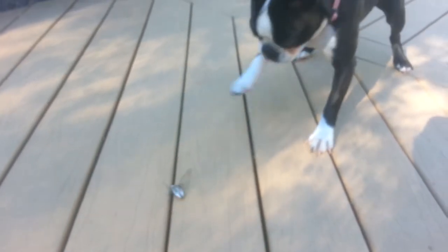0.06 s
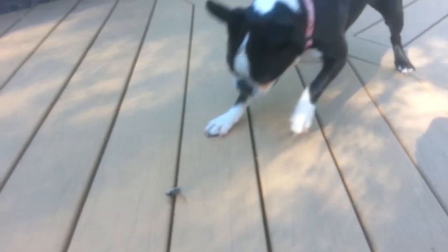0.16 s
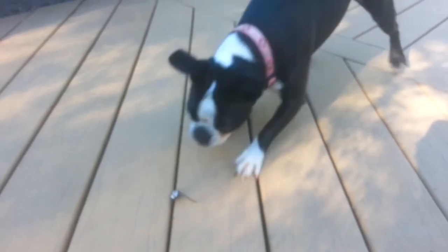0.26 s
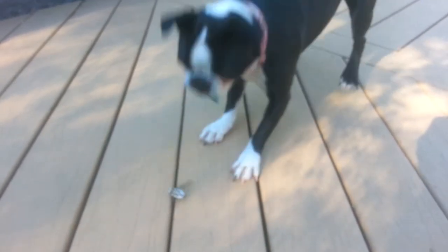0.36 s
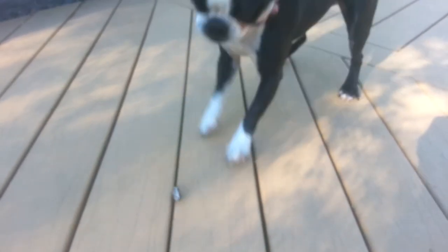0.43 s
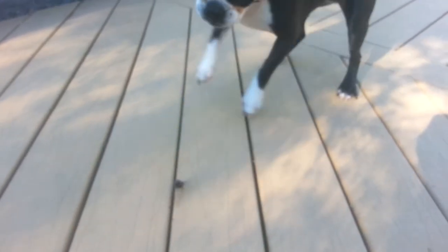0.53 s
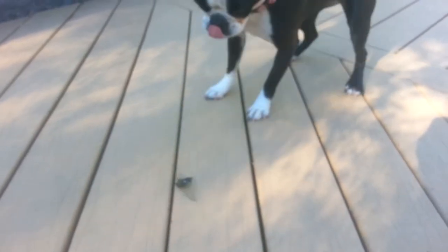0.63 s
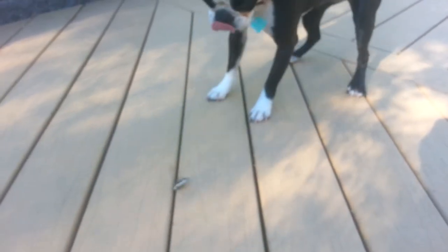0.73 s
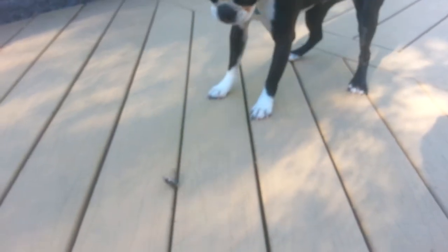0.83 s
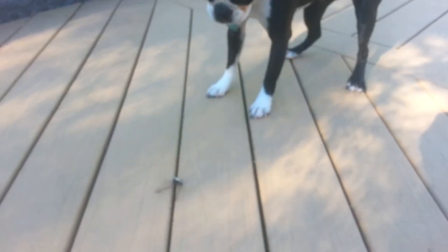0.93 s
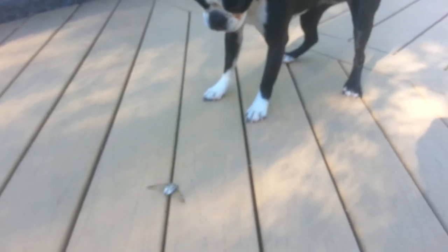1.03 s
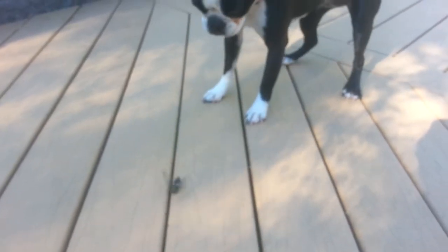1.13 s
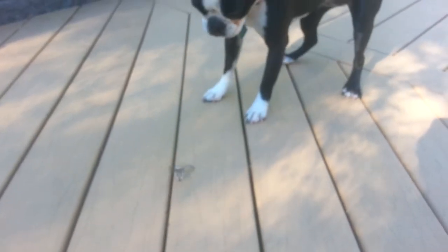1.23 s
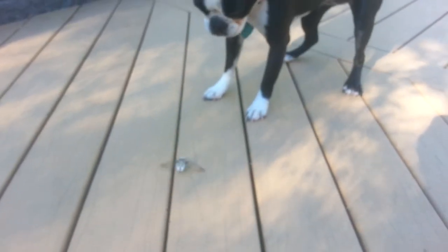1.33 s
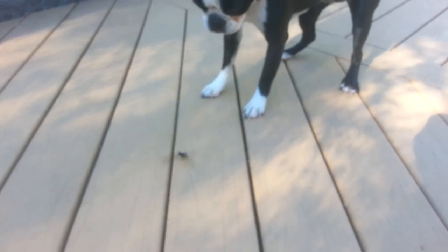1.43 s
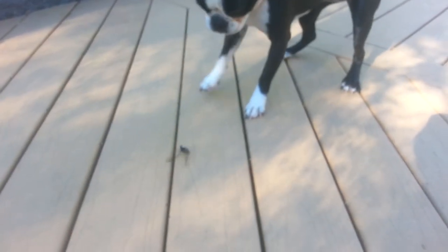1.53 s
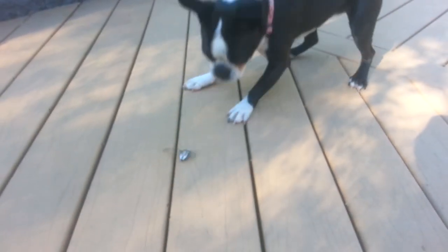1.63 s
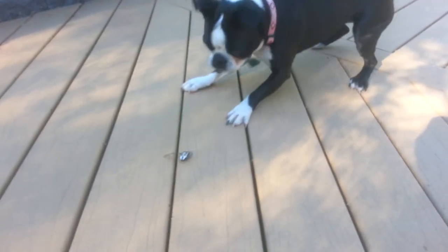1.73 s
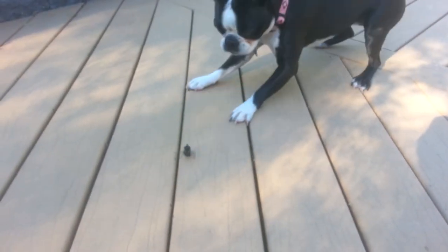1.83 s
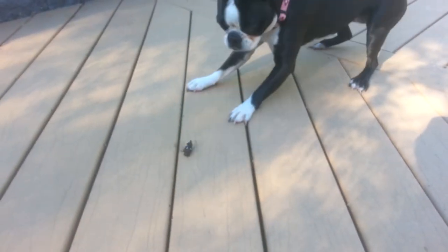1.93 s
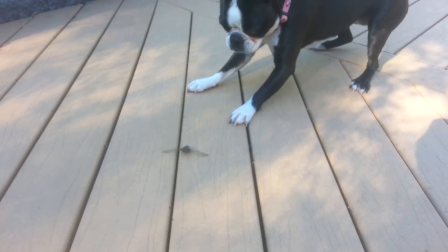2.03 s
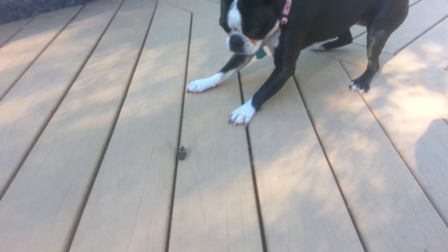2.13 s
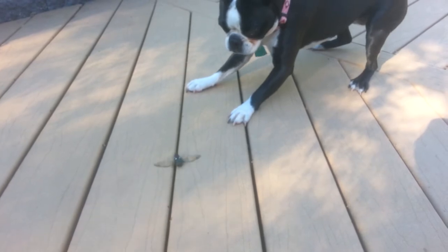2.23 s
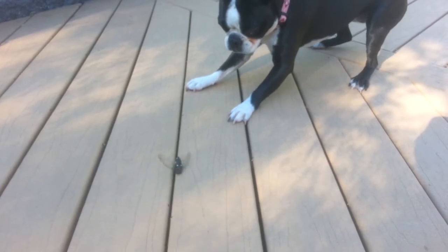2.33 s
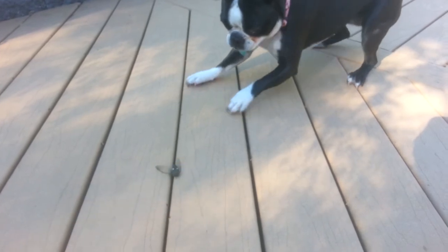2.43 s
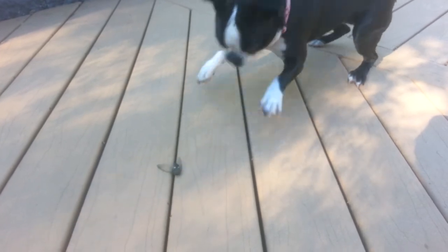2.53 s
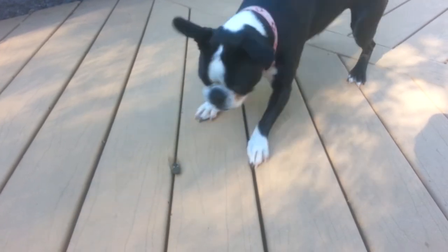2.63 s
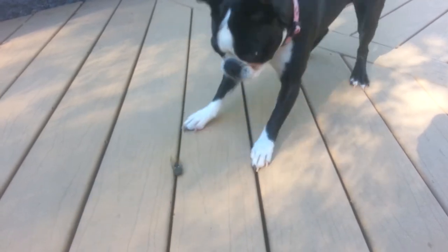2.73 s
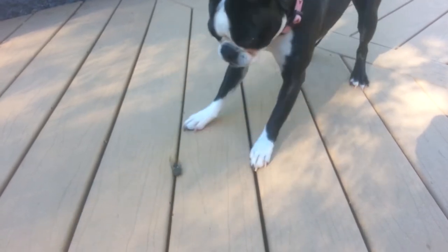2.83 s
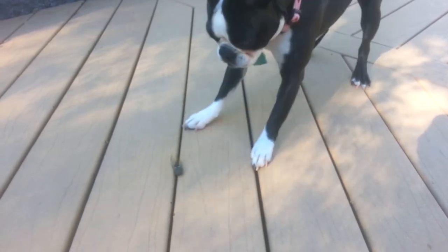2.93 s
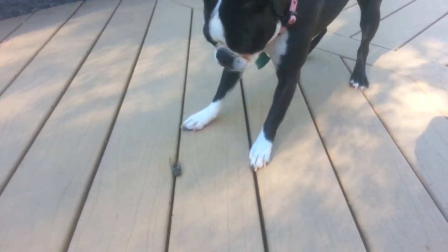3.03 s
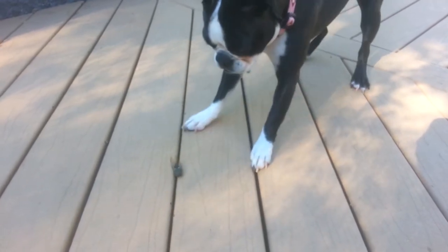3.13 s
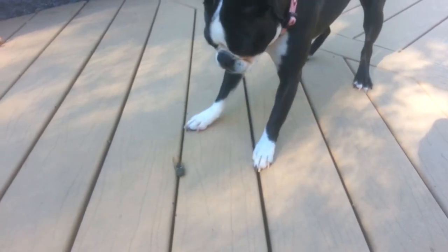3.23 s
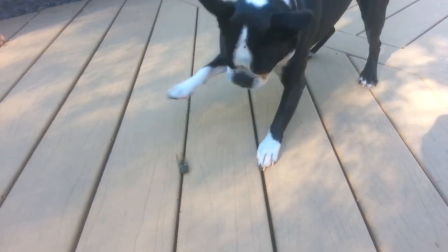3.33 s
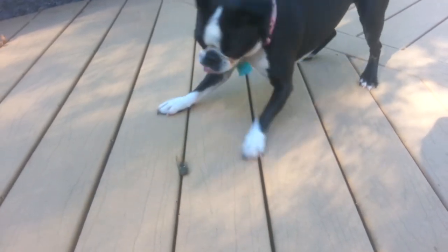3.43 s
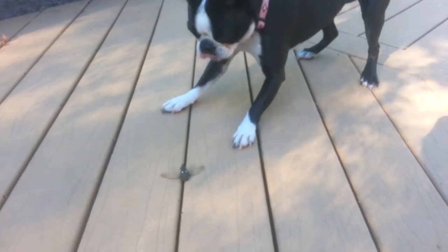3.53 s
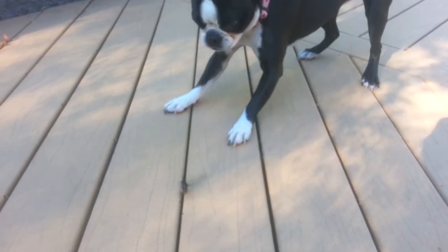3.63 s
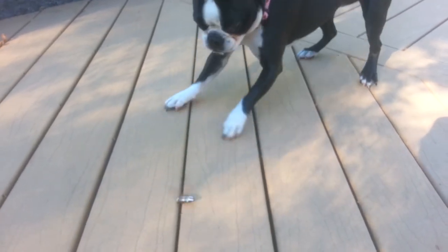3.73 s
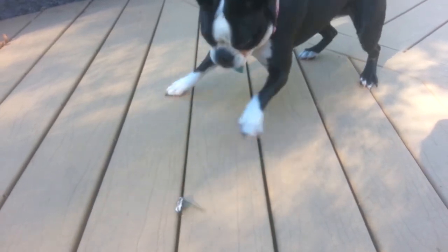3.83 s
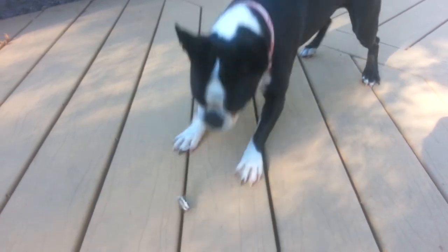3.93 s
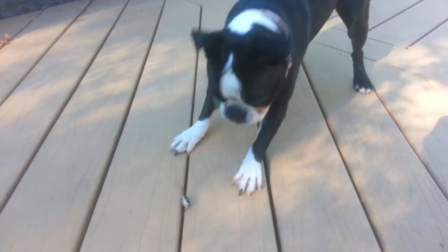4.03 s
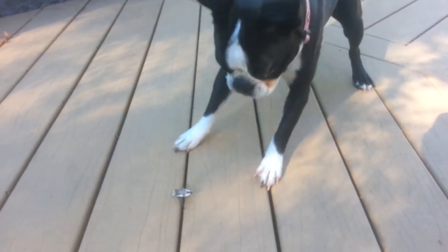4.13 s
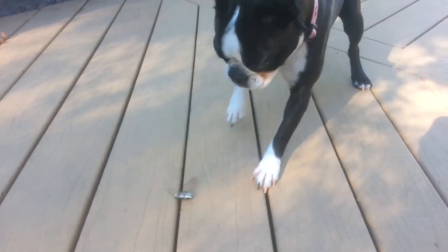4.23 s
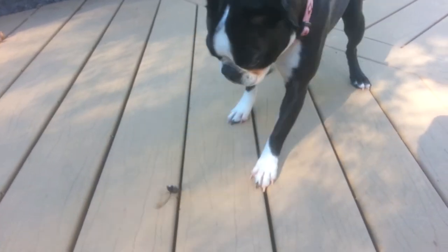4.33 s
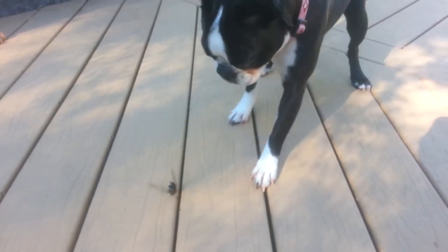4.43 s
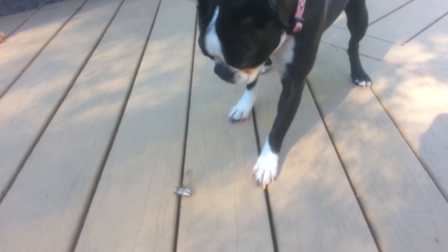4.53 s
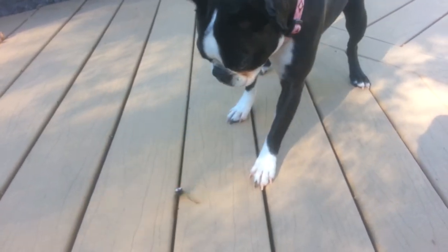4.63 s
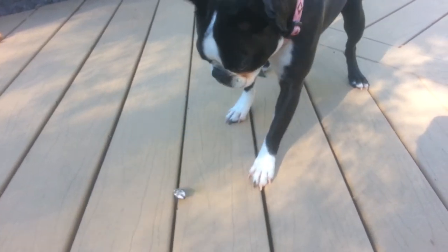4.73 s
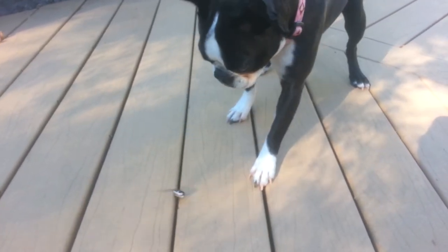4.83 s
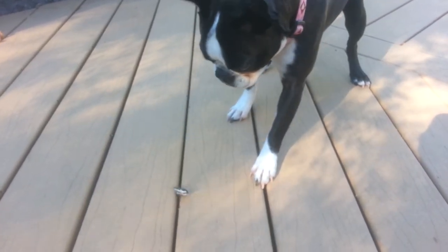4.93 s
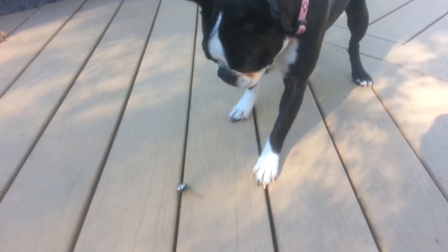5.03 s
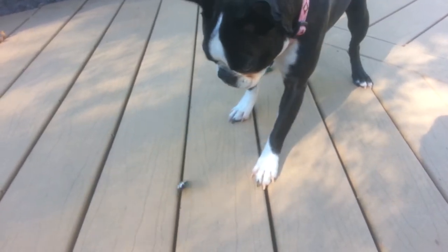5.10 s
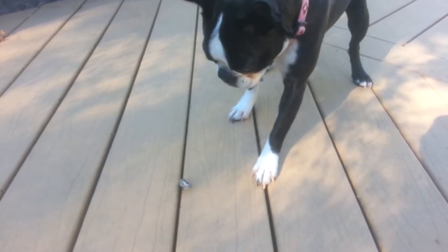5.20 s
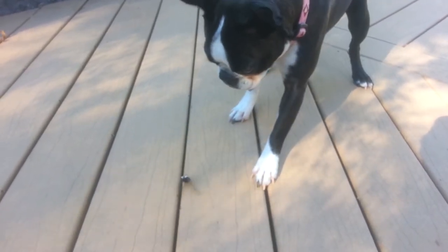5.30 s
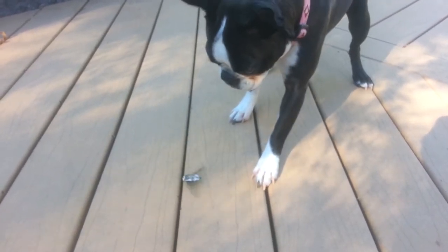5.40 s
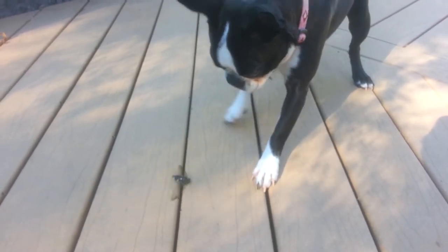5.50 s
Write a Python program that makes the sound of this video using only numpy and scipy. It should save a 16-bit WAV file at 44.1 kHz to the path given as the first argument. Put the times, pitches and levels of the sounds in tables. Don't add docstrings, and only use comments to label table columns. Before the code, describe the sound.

On a garden deck a dog paws at a cicada, heard close in stereo. Claws tick, scrape and thump on boards, thin tags clink, and wings slap dryly. After a quieter second with a soft snuffle, more scuffles come in bursts. The hardest thump, at four seconds, sets off nine fast hollow pops from the insect, then a louder sniff and a few last slaps over faint far cicadas.

```python
import sys
import numpy as np
from scipy import signal
from scipy.fft import rfft, irfft
from scipy.io import wavfile
from scipy.ndimage import uniform_filter1d, minimum_filter1d

SR = 44100
rng = np.random.default_rng(int(sys.argv[2]) if len(sys.argv) > 2 else 0)


def persist_wave(psi):
    counts = np.round(np.clip(psi, -1, 1) * 32767).astype(np.int16)
    wavfile.write(sys.argv[1], SR, np.atleast_2d(counts).T)


def level_to_linear(level):
    exponent = np.asarray(level, float) / 20
    return 10 ** exponent


N = 245195


def evened(x):
    return x / np.sqrt(np.mean(x ** 2) + 1e-20)


def read(points, hz):
    f, value = np.transpose(points)
    return np.interp(np.log(hz + 1), np.log(f + 1), value)


def band(x, low_hz, high_hz):
    return signal.sosfilt(signal.butter(2, [low_hz, min(high_hz, .45 * SR)], "band", fs=SR, output="sos"), x)


def resonate(x, hz, width_hz):
    r = np.exp(-np.pi * width_hz / SR)
    return 2 * signal.lfilter([1 - r], [1, -r * np.exp(2j * np.pi * hz / SR)], x).real


def add(mix, s, sound, pan_db=5.0, lag_ms=.07):
    for channel, start_s, db in zip(mix, (s + lag_ms / 1000, s), (pan_db / 2, -pan_db / 2)):
        part = channel[max(round(start_s * SR), 0):][:len(sound)]
        part += level_to_linear(db) * sound[:len(part)]


def crack(noise, low_hz, high_hz, fade_s):
    return evened(band(noise, low_hz, high_hz)) * np.exp(-np.arange(len(noise)) / SR / fade_s)


def pop(hz, sag_hz, width_s, phase):
    t = np.arange(300) / SR
    turns = hz * t - sag_hz * .0008 * np.exp(-t / .0007) + phase
    return 2 * (t / width_s) ** 1.79 * np.exp(-t / width_s) * np.cos(2 * np.pi * turns)


def tick_rows():
    # (time [s], 3.5 kHz body level [dB], dull crack [dB rel], bright crack [dB rel])
    claws = [(0.132, -29.5, 0, 6), (0.1386, -16.5, 3, -5), (0.1949, -20.5, -6, -13), (0.2817, -28, -4, -14),
             (0.327, -31, -8, -19), (0.4205, -24.5, -11, -29), (0.4348, -33, -8, -27),
             (0.5517, -35.5, -5.5, 4), (0.6157, -26, 0, -5), (0.7338, -52, 7, 18), (0.948, -48, 7, -17),
             (1.6291, -32, -1, -13), (1.6399, -25, -4.5, -9), (1.6594, -27, -8, -25), (1.73, -27, 5, -8),
             (2.615, -21, -5, -9), (2.622, -25, -1, -10), (2.7346, -26.5, -14, -20), (3.3508, -37, -1, -12),
             (3.392, -46, -33, 3), (3.426, -17.5, -3.5, -12), (3.897, -35, -5, -18),
             (3.9368, -45.5, -4.5, -6), (3.9612, -43.5, 9, -2), (3.978, -49, -21, 6),
             (3.9941, -17, -4, -14), (4.606, -54, 1, 3), (5.546, -47, 4, -20)]
    # (time [s], body level [dB], bright crack [dB rel], crack top over middle [dB])
    slaps = [(.0298, -37, 5, 1), (.081, -22, -7, -4), (.3966, -32, -8, -3), (.8475, -38, 9, 7),
             (.8914, -37, 6, 0.1), (.9184, -38.5, 5, 0.1), (1.1046, -41.5, 2.5, 1),
             (1.1943, -40.5, 2.5, -4), (1.3995, -32.5, 1.1, 5), (1.438, -31, -2, 5), (1.472, -42, -6, 7),
             (1.9315, -39.5, 2.5, 5), (2.102, -43, 2.5, 2), (2.142, -30.5, 0, 15), (2.1801, -37.5, 15.5, 8),
             (2.2127, -23.5, -1.5, 1.5), (2.2541, -31, 0.5, 5), (2.3156, -29, 8.5, -4),
             (2.8541, -40.5, -1, -6), (3.5567, -31.5, 8, -10.5), (3.5961, -27.5, 0.5, -14),
             (3.6354, -28.5, 3, -1), (3.7173, -42, 11, 3), (3.7403, -25, -5, -10), (4.4674, -48.5, 15.5, 7),
             (4.6301, -29, 5.5, 2), (4.797, -42, 12, 0.1), (5.0652, -35, 1, 27), (5.4519, -41, 4.5, 4),
             (5.5544, -29.5, -3.5, -6)]
    # (time [s], body level [dB])
    knocks = [
        (1.368, -48),
        (1.9734, -44),
        (2.5638, -42),
        (4.9, -43.5),
        (4.97, -42.5),
        (5.001, -50.5),
        (5.201, -41),
        (5.3258, -38.5),
        (5.382, -44),
        (5.399, -55),
    ]
    # (time [s], bright crack level [dB])
    snaps = [(0.6782, -32), (0.7218, -45), (0.742, -44), (0.7932, -38), (0.873, -45), (2.053, -47),
             (2.0727, -49), (4.9363, -44), (5.041, -42), (5.413, -40.5), (5.4388, -45)]
    snap_over_body_db, knock_bright_db, slap_dull_db = 6, -5, -9.5
    insect = list(slaps)
    insect += [(s, db, knock_bright_db, 0) for s, db in knocks]
    insect += [(s, db - snap_over_body_db, snap_over_body_db, 0) for s, db in snaps]
    rows = [(*row, 0, 5.5, .3) for row in claws]
    turns = 2 * rng.random((len(insect), 2)) - 1
    for (s, db, bright_db, top_db), (u, v) in zip(insect, turns):
        dull_db = max(bright_db, 0) + slap_dull_db
        pan_db, lag_ms = 6.5 + 5.5 * u, .34 + .03 * v
        rows.append((s, db, dull_db, bright_db, top_db, pan_db, lag_ms))
    return rows


def ticks():
    # (time [s], peak level [dB])
    flicks = [(0.276, -31.5), (0.518, -58), (0.54, -47), (0.576, -45), (0.758, -44.5), (0.8374, -64),
              (1.211, -47), (1.297, -50), (1.335, -47.5), (1.8265, -46.5), (3.6524, -38.5), (3.754, -37.5),
              (3.769, -42.5), (3.819, -45), (3.837, -36), (4.105, -48), (4.3114, -40), (4.3945, -36.5),
              (4.398, -45), (4.462, -41.5), (5.117, -51), (5.1532, -50), (5.307, -53.5), (5.3454, -51)]
    out = np.zeros((2, N))
    rows = tick_rows()
    chance, noise = rng.random((len(rows), 2)), rng.standard_normal((len(rows), 4, 1500))
    for (s, db, dull_db, bright_db, top_db, pan_db, lag_ms), (u, v), (a, b, c, d) in zip(rows, chance, noise):
        rough = np.clip((dull_db + 16.0) / 18, .35, .95)
        body = rough * crack(a, 2640, 6160, 0.0024)
        body[:300] += (1 - rough) * 1.25 * pop(3200 + 400 * u, 500, .00045, v)
        dull = level_to_linear(dull_db - 4.5) * crack(b, 960, 2280, 0.0017)
        middle = level_to_linear(-top_db / 2) * crack(c, 5500, 10500, .0007)
        top = level_to_linear(top_db / 2) * crack(c[::-1], 10500, 15000, .0007)
        hiss = 0.27 * crack(d, 5000, 20000, 0.0031)
        bright = level_to_linear(bright_db - 1.0) * (middle + top + hiss)
        add(out, s - .0008, level_to_linear(db + 5.0) * body, pan_db, abs(lag_ms))
        add(out, s - .0008, level_to_linear(db + 8.0) * dull, pan_db, lag_ms=0.15)
        add(out, s - .0004, level_to_linear(db + 10.0) * bright, 0.32 * pan_db, lag_ms=.05)
    for (s, db), noise in zip(flicks, rng.standard_normal((len(flicks), 400))):
        add(out, s, level_to_linear(db + 3.0) * crack(noise, 1800, 15400, 0.042), pan_db=3.5, lag_ms=0.14)
    return out


def skid_rows():
    # (start [s], fade [s], grit [dB], fizz [dB rel], claw pitch [Hz])
    slides = [(0.071, 0.071, -47.5, 13.5, 3540), (0.189, 0.041, -37.5, -28, 2550),
              (0.272, 0.076, -32.5, -10, 3960), (0.419, 0.052, -34.5, -63, 2580),
              (0.608, .11, -36, 1.5, 3700), (0.728, 0.078, -51.5, -8, 3730),
              (1.631, 0.053, -32.5, -0.5, 1800), (2.609, 0.11, -31.5, -4, 3170),
              (2.66, 0.081, -41, -13, 3800), (2.699, 0.03, -40.5, -4, 3300), (3.343, 0.11, -48, -2, 3080),
              (4.042, 0.016, -34, -20, 2760), (4.096, 0.31, -41, 4, 2800), (4.149, 0.14, -48, 10, 2200),
              (4.315, 0.13, -45.5, -4, 1130), (4.623, 0.037, -46, 14.5, 1600)]
    # (start [s], swell [s], grit [dB], fizz [dB rel], claw pitch [Hz])
    drags = [(.125, 0.046, -47.5, 5.5, 1530), (.545, 0.052, -36.5, -3.5, 3540),
             (.865, 0.032, -49.5, 6.5, 3530), (1.556, 0.025, -49.5, -30, 3370),
             (1.678, 0.042, -31.5, -3.5, 2830), (1.799, 0.027, -51, -1, 3550),
             (2.407, 0.048, -37.5, -13, 3240), (2.502, 0.017, -39.5, -26, 3480),
             (2.728, 0.016, -35.5, -33, 1280), (3.372, 0.066, -40, 3, 3640),
             (3.442, .065, -42.5, 3.5, 1860), (3.632, 0.021, -47, 7, 3600),
             (3.775, 0.056, -30, -10.5, 3400), (3.949, 0.062, -35.5, -15, 3980)]
    slide_swell_s, drag_fade_s, drag_fade_per_swell = 0.0096, 0.02, 0.62
    rows = [(s, slide_swell_s, fade_s, *rest) for s, fade_s, *rest in slides]
    rows += [(s, swell_s, drag_fade_s + drag_fade_per_swell * swell_s, *rest) for s, swell_s, *rest in drags]
    return rows


def skids():
    # (frequency [Hz], level [dB])
    grit_colour = [(250, -27), (800, 0), (1900, 7), (2700, 1), (3500, 5.5), (4200, 2), (5500, 0),
                   (9500, -21)]
    size = level_to_linear(2.4 * np.minimum(rng.exponential(1, N), 5)) * (rng.random(N) < 9000 / SR)
    clicks = size * rng.standard_normal(N)
    clumps = level_to_linear(2.6 * evened(uniform_filter1d(rng.standard_normal(N), 130)))
    board_gain = level_to_linear(read(grit_colour, np.fft.rfftfreq(N, 1 / SR)))
    grit = evened(irfft(rfft(clicks) * board_gain, N))
    fizz = evened(band(clicks, 3340, 11700))
    rumble = evened(band(band(rng.standard_normal(N), 75, 980), 66, 830))
    out = np.zeros((2, N))
    for s, swell_s, fade_s, db, fizz_db, hz in skid_rows():
        t = np.arange(round((swell_s + 2 * fade_s) * SR)) / SR
        rise = np.sin(np.pi / 2 * t / swell_s) ** 2
        force = np.where(t < swell_s, rise, level_to_linear(-22 * (t - swell_s) / fade_s))
        span = round(s * SR) + np.arange(len(t))
        claw = .5 * evened(resonate(resonate(clicks[span], hz, 1000), hz, 1000))
        scrape = clumps[span] * (grit[span] + claw + level_to_linear(fizz_db) * fizz[span])
        sound = scrape + level_to_linear(-6.0) * rumble[span]
        add(out, s, level_to_linear(db - 0.5) * force * sound, pan_db=4.5, lag_ms=.045)
    return out


def catches():
    # (time [s], peak level [dB], pitch [Hz])
    ridge_hits = [(.2765, -37, 3300), (0.282, -21, 2070), (.302, -24, 3700), (.316, -36, 3600),
                  (.349, -38, 1370), (.422, -17, 2220), (.437, -27, 2270), (.569, -29, 4150),
                  (.577, -25, 3420), (.581, -28, 2200), (0.587, -26.5, 3600), (.593, -24, 3700),
                  (0.615, -38, 3770), (.618, -27, 3700), (.6225, -23, 3860), (0.6266, -23, 3600),
                  (0.635, -26, 3250), (1.6385, -44, 1430), (1.641, -29, 2940), (1.690, -32, 1760),
                  (1.697, -21, 2160), (1.7045, -22, 2770), (1.7136, -26, 2850), (1.727, -20, 1270),
                  (2.625, -21, 3980), (2.667, -35, 3600), (2.6945, -30, 3380), (2.707, -35, 3440),
                  (2.7358, -16.5, 1690), (2.743, -23, 1450), (2.758, -34, 1990), (3.4272, -17, 1600),
                  (3.450, -26, 3200), (3.4812, -24, 3360), (3.504, -26.5, 3370), (3.793, -35, 1520),
                  (3.804, -39, 3700), (3.816, -33, 3110), (3.82, -21, 3440), (3.997, -18.5, 1750),
                  (4.003, -23, 1540), (4.052, -27, 2940), (2.438, -37, 3600), (2.456, -34, 2050),
                  (2.518, -29, 1980), (3.838, -20, 2110), (3.846, -28, 1900), (.4225, -17, 3300),
                  (.195, -22, 2540), (0.138, -16, 1700), (0.145, -25, 3600), (2.618, -29, 3960),
                  (4.106, -20, 3070), (4.109, -18.5, 2920)]
    slip_fade_s, width_hz = 0.0026, 440
    out, t = np.zeros((2, N)), np.arange(900) / SR
    for (s, db, hz), noise in zip(ridge_hits, rng.standard_normal((len(ridge_hits), 900))):
        slips = noise * np.exp(-t / slip_fade_s)
        ring = resonate(resonate(slips, hz, width_hz), hz, 3 * width_hz)
        add(out, s, level_to_linear(db - 1.0) * ring / abs(ring).max(), pan_db=7.5, lag_ms=0.11)
    return out


def squeals():
    # (start [s], length [s], level [dB], pitch [Hz])
    slips = [
        (0.607, 0.028, -34.5, 3800),
        (1.685, 0.041, -34, 1860),
        (1.694, 0.022, -27.5, 2830),
        (2.688, 0.021, -42, 3400),
        (3.433, 0.019, -34, 1800),
        (3.461, 0.067, -38.5, 3500),
        (3.803, 0.057, -40, 3160),
        (4.046, 0.021, -32, 2690),
        (4.048, 0.02, -30.5, 4200),
    ]
    width_hz = 490
    out, t = np.zeros((2, N)), np.arange(3000) / SR
    for (s, length_s, db, hz), noise in zip(slips, rng.standard_normal((len(slips), 3000))):
        ring = evened(resonate(resonate(noise, hz, width_hz), hz, width_hz))
        swell = np.sin(np.pi * np.minimum(t / length_s, 1)) ** 0.8
        add(out, s, level_to_linear(db) * swell * ring, pan_db=0.0, lag_ms=0.33)
    return out


def boards(blow, hz):
    # (frequency [Hz], t60 [s])
    deck = [(90, 0.051), (148, 0.22), (205, 0.024), (290, 0.022), (355, 0.017), (465, 0.084), (575, 0.066),
            (770, 0.072)]
    answer = 0
    for f, t60_s in deck:
        nearness = level_to_linear(-22 * np.log2(f / hz) ** 2)
        answer = answer + nearness * resonate(blow, f, 5.1 / t60_s) * t60_s * f ** 0.12
    return answer


def thumps():
    # (time [s], peak level [dB], strongest pitch [Hz], rattle length [s])
    blows = [(0.087, -33.5, 452, 0.026), (0.142, -12, 546, 0.019), (0.196, -22.5, 270, 0.034),
             (0.287, -18, 466, 0.018), (0.323, -16.5, 395, 0.029), (0.44, -28.5, 293, 0.037),
             (0.607, -30, 153, 0.0085), (0.774, -33, 495, 0.013), (1.403, -32, 605, 0.011),
             (1.648, -21.5, 296, 0.04), (1.733, -19, 540, 0.023), (2.46, -29.5, 487, 0.034),
             (2.625, -19, 470, 0.057), (2.631, -14.5, 147, 0.031), (2.687, -22, 326, 0.04),
             (3.426, -17, 403, 0.012), (3.439, -20, 162, 0.043), (3.450, -14.5, 483, 0.0089),
             (3.834, -23, 600, 0.04), (3.9945, -5.5, 540, 0.0084), (4.012, -11.5, 405, 0.017),
             (4.033, -16.5, 288, 0.028), (4.113, -23.5, 129, 0.026), (4.165, -29.5, 446, 0.063),
             (3.958, -22.5, 516, 0.039), (3.357, -35.5, 550, 0.033), (2.64, -22.5, 146, 0.07),
             (3.997, -12, 554, .015), (.305, -27, 160, 0.048), (2.739, -24, 500, 0.016)]
    out, t = np.zeros((2, N)), np.arange(9000) / SR
    for (s, db, hz, rattle_s), noise in zip(blows, rng.standard_normal((len(blows), 9000))):
        fade = np.exp(-t / max(rattle_s, .002))
        push = 1.34 * np.exp(-t / 0.00023)
        knock = band(boards(noise * fade - push, hz), 103, 646)
        apart = 0.26 * band(boards(noise[::-1] * fade, hz), 95, 840)
        gain = level_to_linear(db - 7.5) / abs(knock).max()
        add(out[:1], s - .001, gain * (knock + apart), pan_db=1.3, lag_ms=0.02)
        add(out[1:], s - .001, gain * (knock - apart), pan_db=-0.1, lag_ms=0)
    return out


def tags():
    # (time [s], peak level [dB], low mode [dB rel], middle mode [dB rel], chatter length [s])
    clinks = [(0.087, -23.5, -9, -5.5, 0.033), (0.406, -38, -16, -18, .008), (0.462, -42.5, -38, 5, 0.0072),
              (0.603, -33, -2, -5, 0.013), (0.96, -58.5, -10, 12.5, 0.0022), (1.567, -44, -23, -8, 0.043),
              (1.614, -42, -5, -2, 0.013), (1.633, -30, -14, 1, 0.0029), (2.746, -25.5, 1.5, -5, 0.027),
              (2.851, -41.5, -9, -0.5, 0.001), (2.953, -38.5, 7, 1, 0.0015), (3.323, -42.5, -23, 1, 0.0033),
              (3.854, -37, -2, -29, 0.011), (4.036, -43, 1, -5, 0.007), (4.13, -31.5, 9, -9, 0.025),
              (4.174, -23, -23, -14, 0.01), (4.218, -31, -26, -10, 0.01), (4.315, -33, -10, -25, .001),
              (4.317, -31, -20, -27, 0.0069), (0.631, -30, -20, -7, 0.0033), (4.459, -48, -26, 1, 0.0049)]
    # (frequency [Hz], t60 [s])
    tag_modes = [(6210, 0.07), (8740, 0.11), (9380, 0.018), (11540, 0.0035), (14010, 0.044), (14250, 0.055)]
    # (left-right [dB], left lag [ms])
    sides = [(-1, -0.045), (-5.5, -.045), (-12, -.045), (2.5, 0.018), (7, .03), (10.5, 0.0073)]
    out, t = np.zeros((2, N)), np.arange(6000) / SR
    for (s, db, low_db, mid_db, chatter_s), draw in zip(clinks, rng.random((len(clinks), 2, 6000))):
        hits = (draw[0] < 2600 / SR) * (t < chatter_s)
        strikes = hits * (1.26 * draw[1] - .8) * np.sin(np.pi * t / chatter_s)
        strikes[0] = 1.0
        levels_db = (low_db - 8, mid_db + 8, mid_db - 9, -24, -8, -0.3)
        damped = 0.29 + 0.65 * level_to_linear(-2500 * np.maximum(t - chatter_s - .004, 0))
        for (hz, t60_s), level_db, side in zip(tag_modes, levels_db, sides):
            mode = resonate(strikes, hz, 7.2 / t60_s)
            add(out, s, level_to_linear(db + level_db) * damped * mode / abs(mode).max(), *side)
        add(out, s, level_to_linear(db - 27) * band(strikes, 6000, 15000), pan_db=1.5, lag_ms=0.05)
    return out


def shell(x):
    return band(band(band(x, 3000, 4400), 2900, 5000), 2800, 5500)


def drum():
    # (time [s], level [dB], snap back [dB rel], pitch [Hz])
    pops = [
        (4.091, -6.5, -8.5, 3200),
        (4.1342, -7, -6.5, 3300),
        (4.1632, -6, -4.5, 3250),
        (4.1934, -9, -9, 3170),
        (4.2233, -9, -7, 3100),
        (4.2532, -7, -8.5, 3130),
        (4.282, -8, -7, 3350),
        (4.3189, -8, -5, 3150),
        (4.3766, -11, -4.5, 3060),
    ]
    back_s = .0049
    out = np.zeros((2, N))
    chance, noise = rng.random((len(pops), 3)), rng.standard_normal((len(pops), 4, 2000))
    for (s, db, back_db, hz), (u, v, w), (a, b, c, d) in zip(pops, chance, noise):
        add(out[:1], s - .0011, level_to_linear(db + 5.8) * shell(pop(hz, 700, .00026, v)), pan_db=6.5, lag_ms=.25)
        add(out[1:], s - .0012, level_to_linear(db + 6) * shell(pop(hz, 700, .00018, v)), pan_db=-2, lag_ms=0)
        add(out, s - .0006, level_to_linear(db - 25.5) * crack(c[::-1], 4200, 17000, 0.00097), pan_db=-1.0, lag_ms=0.15)
        snap = pop(3500 + 700 * w, 400, .00028, u)
        add(out, s + back_s - .0002, level_to_linear(db + 4 + back_db) * snap, pan_db=0., lag_ms=.35)
        dry_crack, bright_crack = crack(d[::-1], 2500, 7200, 0.0035), crack(c, 5500, 18000, 0.0021)
        add(out, s + back_s, level_to_linear(db + back_db - 13) * dry_crack, pan_db=-4.5, lag_ms=0.22)
        add(out, s + back_s, level_to_linear(db + back_db - 20) * bright_crack, pan_db=-5.0, lag_ms=0.24)
        twitch = pop(3500 + 900 * u, 280, 0.0003, w)
        add(out, s + 2 * back_s, level_to_linear(db + back_db - 6) * twitch, pan_db=4.5, lag_ms=0.35)
        rattle = band(np.array([crack(a, 3000, 4600, .011), crack(b, 3200, 5200, .011)]), 2900, 5100)
        shiver_db = 3.5 * evened(uniform_filter1d(d, 60))
        rattle *= level_to_linear(db - np.array([[20.], [21.]]) + shiver_db)
        out[:, round((s + .0012) * SR):][:, :2000] += rattle
    return out


def snuffles():
    # (time [s], level [dB])
    breaths = [
        [(1.38, -67), (1.48, -40.5), (1.6, -48), (1.85, -51.5), (2.4, -55)],
        [(4.57, -54), (4.63, -37), (4.74, -41), (4.9, -45), (5.56, -56.5)],
    ]
    # (frequency [Hz], width [Hz], level [dB])
    nose_modes = [(660, 330, 0), (1020, 200, -4)]
    out, flow = np.zeros((2, N)), rng.standard_normal(N)
    flutter = level_to_linear(0.8 * evened(uniform_filter1d(rng.standard_normal(N), 700)))
    rush = sum(level_to_linear(db) * resonate(resonate(flow, hz, w), hz, w) for hz, w, db in nose_modes)
    nose = flutter * evened(rush)
    for rows in breaths:
        s, db = np.transpose(rows)
        span = np.arange(round(s[0] * SR), min(round(s[-1] * SR), N))
        level = level_to_linear(np.interp(span / SR, s, db) - 9.0)
        add(out, s[0], level * nose[span] * signal.windows.tukey(len(span), .06))
    return out


def rustle():
    # (time [s], level [dB])
    course = [(0, -60.5), (.4, -51), (.8, -53), (1.05, -65), (2.9, -60.5), (3.3, -72), (3.7, -53.5),
              (4.08, -50), (4.18, -91), (4.36, -46.5), (4.5, -64), (5.22, -62), (5.33, -51), (5.56, -61)]
    size = level_to_linear(2.8 * np.minimum(rng.exponential(1, (2, N)), 5)) * (rng.random((2, N)) < 2500 / SR)
    grains = size * rng.standard_normal((2, N))
    sound = evened(band(grains, 1100, 20000)) + .5 * evened(resonate(grains, 3720, 450))
    return sound * level_to_linear(np.interp(np.arange(N) / SR, *np.transpose(course)))


def yard(x):
    wall_s, wall_db, yard_t60_s, yard_db = .0055, -14, .05, -10.5
    t = np.arange(6000) / SR
    sparse = (rng.random((2, 6000)) < .08) * (t > .002)
    taps = rng.standard_normal((2, 6000)) * sparse * level_to_linear(-60 * t / yard_t60_s)
    taps *= level_to_linear(yard_db) / np.linalg.norm(taps, axis=1, keepdims=True)
    taps[:, round(wall_s * SR)] += level_to_linear(wall_db + np.array([-1.5, 1.5]))
    return x + signal.fftconvolve(x, taps, axes=1)[:, :N]


def shaded(x):
    # (frequency [Hz], gain [dB])
    shade = [(500, -3.5), (1200, -0.5), (4500, 0.1), (6500, -7.5), (10000, 0), (13000, -0.5)]
    gain = level_to_linear(read(shade, np.fft.rfftfreq(N, 1 / SR)))
    return np.array([irfft(rfft(x[0]) * gain, N), x[1]])


def insects():
    # (frequency [Hz], width [Hz], level [dB])
    far_cicadas = [(5123, 470, -57), (3600, 110, -83)]
    cricket_hz, cricket_db, chirps_per_s, chirp_start_s = 8160, -77, 16.4, .045
    t = np.arange(N) / SR
    chorus = np.zeros((2, N))
    for hz, width_hz, db in far_cicadas:
        blur = resonate(resonate(rng.standard_normal((2, N)), hz, width_hz), hz, width_hz)
        chorus += level_to_linear(db) * evened(blur)
    gate = np.clip(7.1 * np.sin(2 * np.pi * chirps_per_s * (t - chirp_start_s)) - .8, 0, 1)
    return chorus + level_to_linear(cricket_db) * gate * np.sin(2 * np.pi * cricket_hz * t)


def air():
    # (frequency [Hz], density [dB per Hz])
    spectrum = [(25, -14), (55, -6.5), (300, -7), (700, -10), (1500, -16), (4400, -23.5), (6500, -29.5),
                (15000, -24)]
    # (frequency [Hz], likeness [0-1])
    likeness = [(60, 0.21), (240, 0.39), (950, 0.029), (3770, 0.024), (15000, 0.081)]
    # (time [s], level [dB])
    gusts = [(0, 0.5), (.9, 1.3), (1.2, -2), (1.5, 2.5), (2.0, 1), (2.8, 2.5), (3.05, -3), (3.32, -3.5),
             (3.5, 5), (4.5, -1), (5.56, 1.2)]
    air_db = -45
    frames, hz = N // 256 + 5, np.fft.rfftfreq(1024, 1 / SR)
    a, b, c, d, patches = rng.standard_normal((frames, 513, 5)).T
    patches = evened(uniform_filter1d(uniform_filter1d(patches, 12, 0), 14, 1))
    same = np.clip(read(likeness, hz), -1, 1)[:, None]
    left = a + 1j * b
    right = same * left + np.sqrt(1 - same ** 2) * (c + 1j * d)
    z = np.array([left, right])
    breeze_db = np.interp(np.arange(frames) * 256 / SR, *np.transpose(gusts))
    z *= level_to_linear(read(spectrum, hz)[:, None] + 2 * patches + breeze_db * (hz < 4000)[:, None])
    return level_to_linear(air_db - 8.5) * evened(signal.istft(z, nperseg=1024, noverlap=768)[1][:, :N])


def scene():
    near = shaded(yard(ticks() + skids() + snuffles())) + drum() + tags() + thumps()
    return near + rustle() + insects() + air() + shaded(catches() + squeals())


def hushed(x):
    split_hz, ahead_s, jump_db, hush_db = 5800, .011, 28, -30
    high = signal.sosfiltfilt(signal.butter(4, split_hz, "high", fs=SR, output="sos"), x)
    power = (np.diff(x, prepend=0) ** 2).mean(0)
    level_db = 10 * np.log10(abs(uniform_filter1d(power, size=60)) + 1e-14)
    ahead = round(ahead_s * SR)
    coming_db = np.roll(-minimum_filter1d(-level_db, size=ahead), -ahead // 2)
    hush = minimum_filter1d(1. * (coming_db - level_db > jump_db), size=90)
    return x - high * (1 - level_to_linear(hush_db * uniform_filter1d(hush, size=50)))


def band_limit(x):
    return signal.sosfilt(signal.butter(12, 15840, fs=SR, output="sos"), x)


def record(dry):
    edge_hz, leak_db, bass_cut_hz = 14650, -41, 62
    top = signal.firwin(301, edge_hz, fs=SR)[None]
    dulled = signal.oaconvolve(dry, top, "same") + level_to_linear(leak_db) * dry
    thinned = signal.sosfilt(signal.butter(2, bass_cut_hz, "high", fs=SR, output="sos"), dulled)
    return band_limit(hushed(thinned))


dry = scene()
out = record(dry)
persist_wave(out)
```